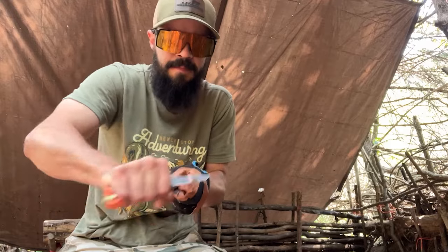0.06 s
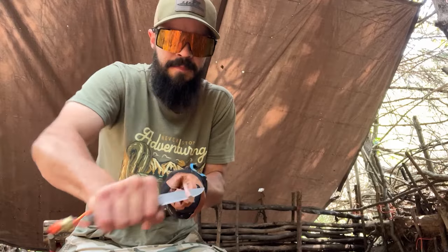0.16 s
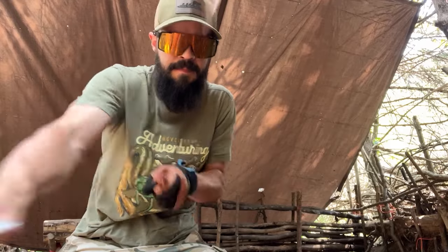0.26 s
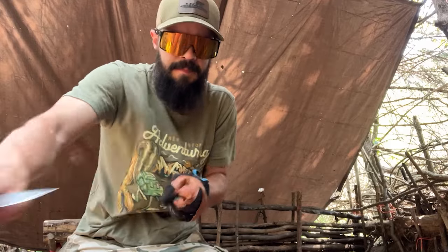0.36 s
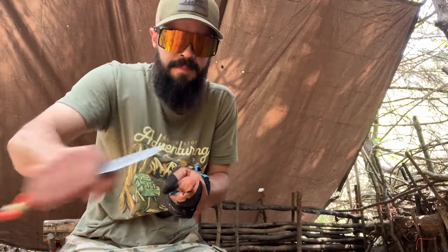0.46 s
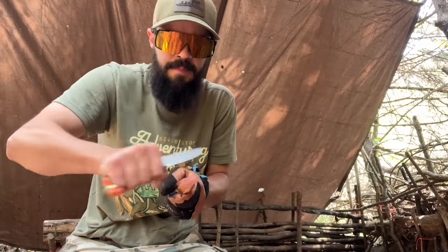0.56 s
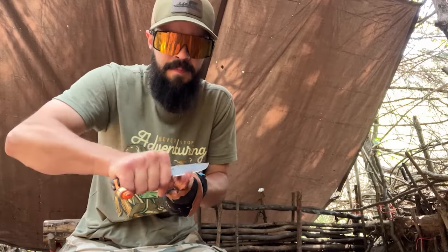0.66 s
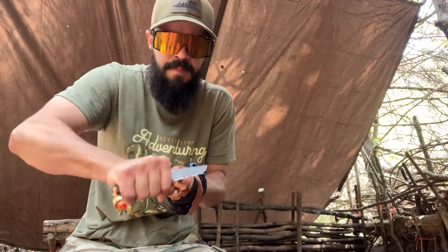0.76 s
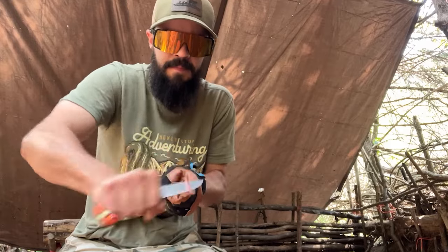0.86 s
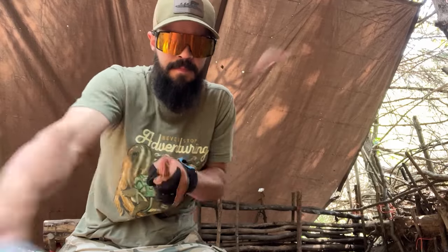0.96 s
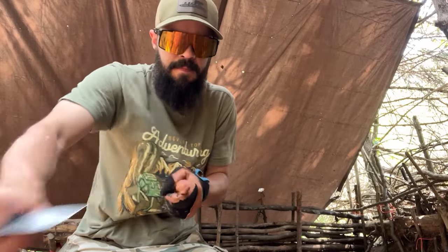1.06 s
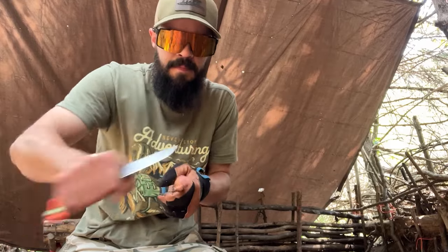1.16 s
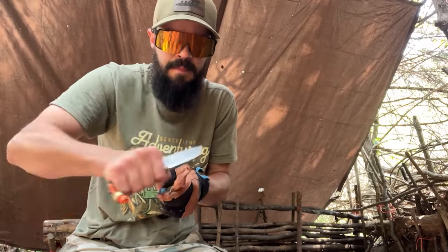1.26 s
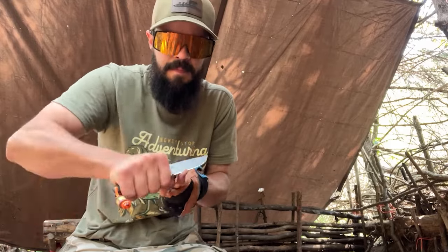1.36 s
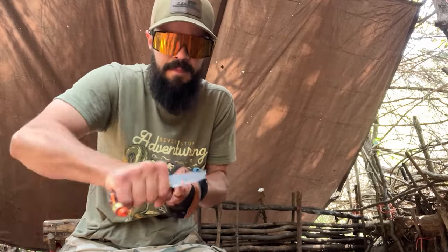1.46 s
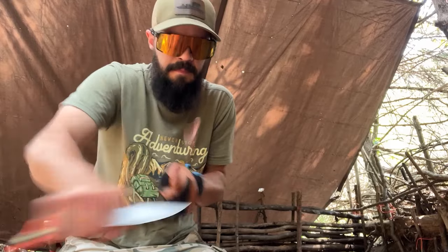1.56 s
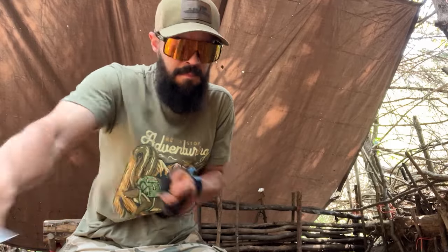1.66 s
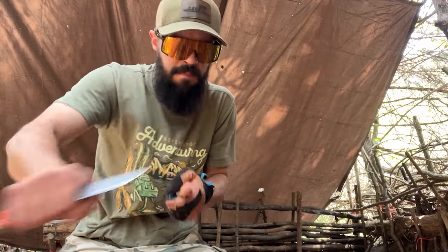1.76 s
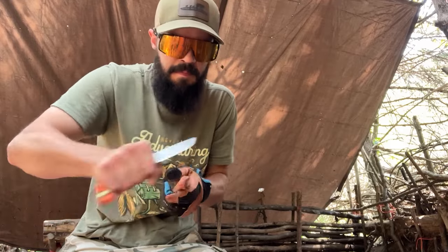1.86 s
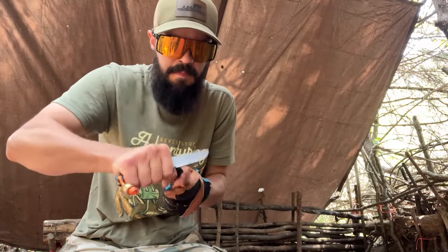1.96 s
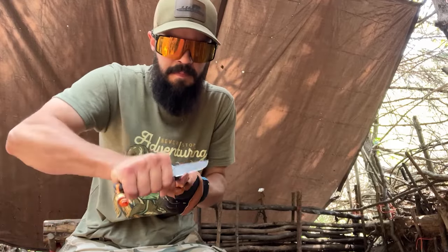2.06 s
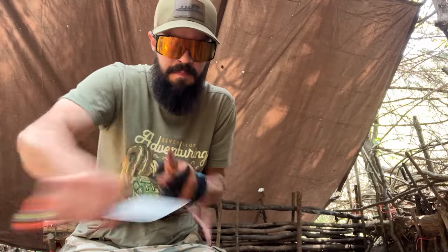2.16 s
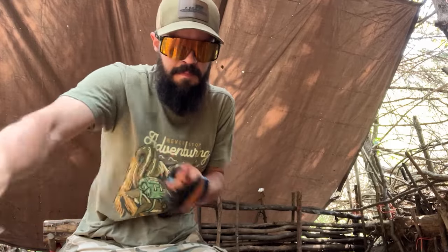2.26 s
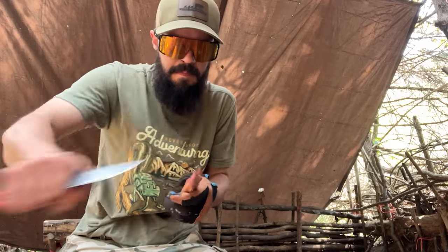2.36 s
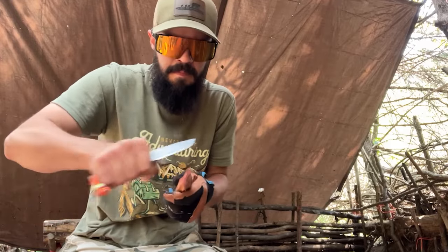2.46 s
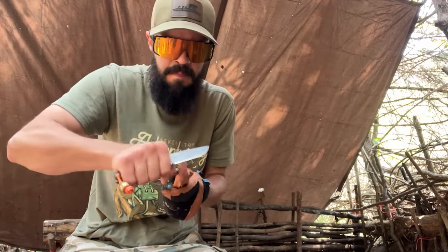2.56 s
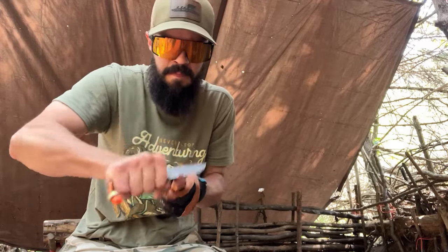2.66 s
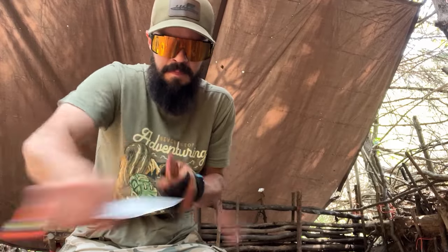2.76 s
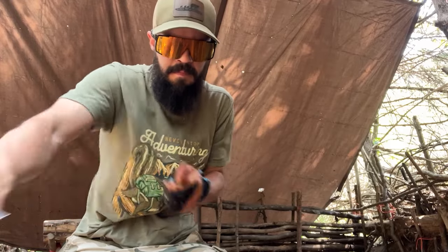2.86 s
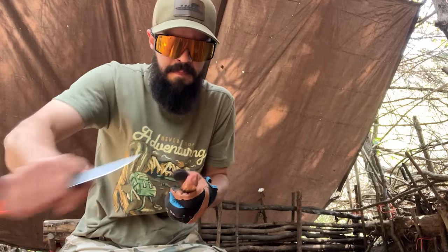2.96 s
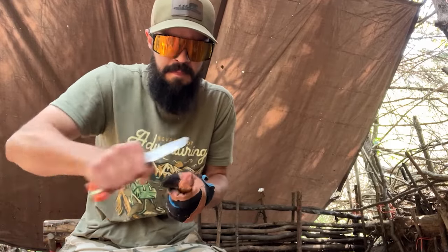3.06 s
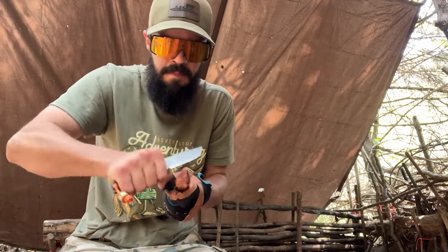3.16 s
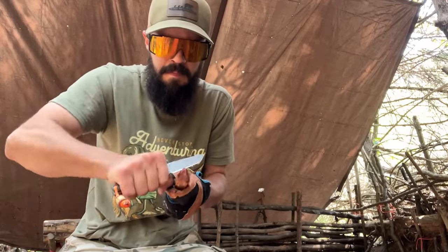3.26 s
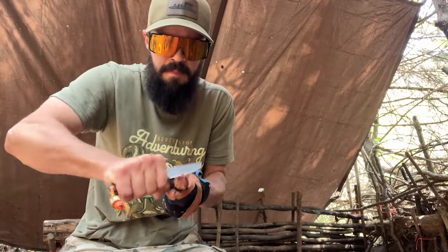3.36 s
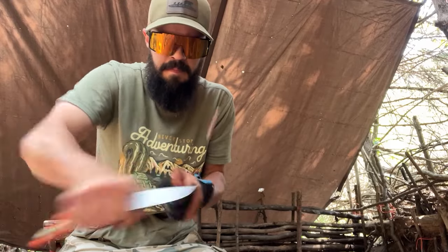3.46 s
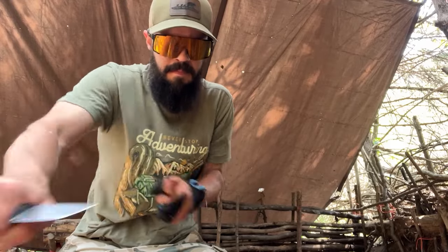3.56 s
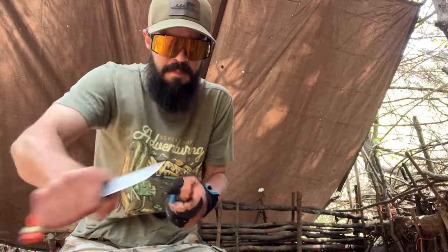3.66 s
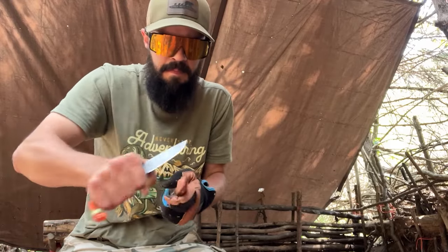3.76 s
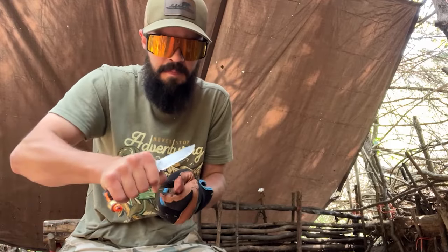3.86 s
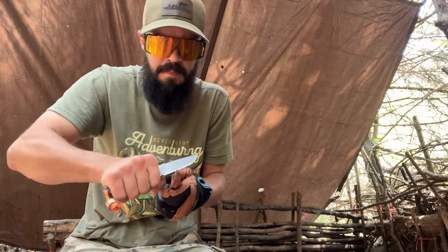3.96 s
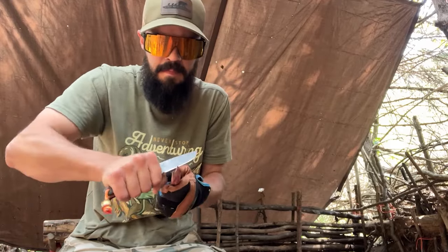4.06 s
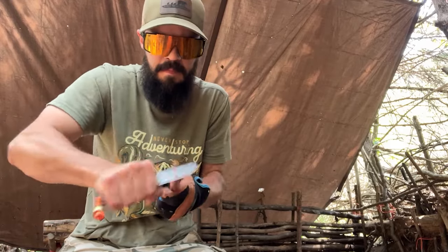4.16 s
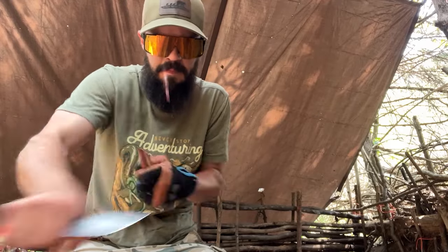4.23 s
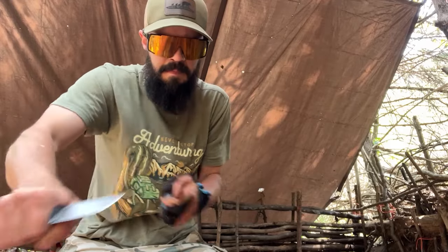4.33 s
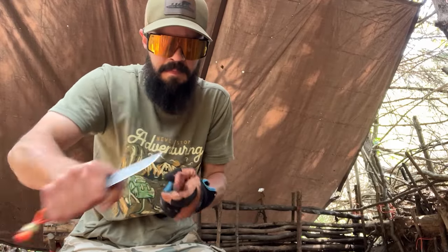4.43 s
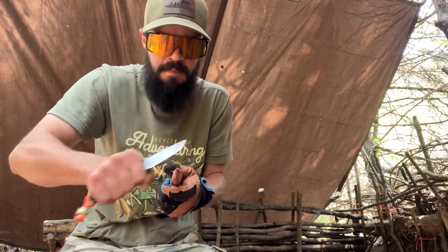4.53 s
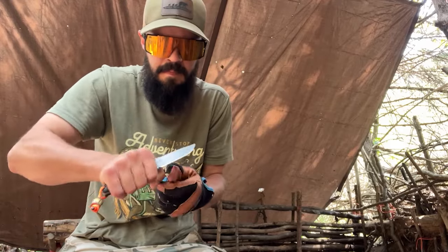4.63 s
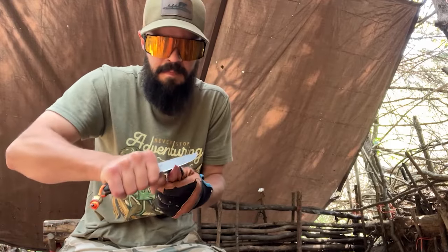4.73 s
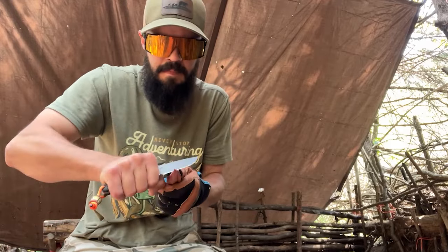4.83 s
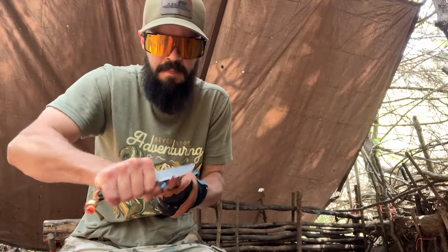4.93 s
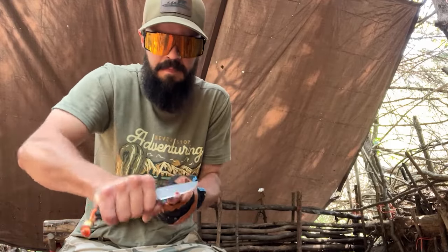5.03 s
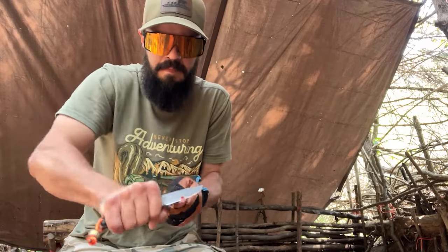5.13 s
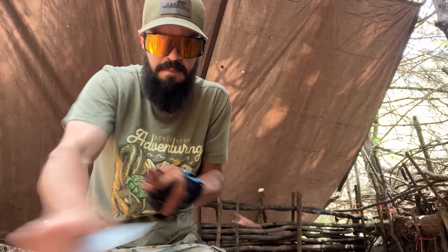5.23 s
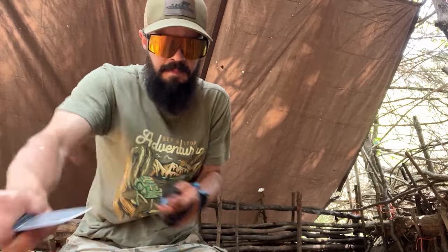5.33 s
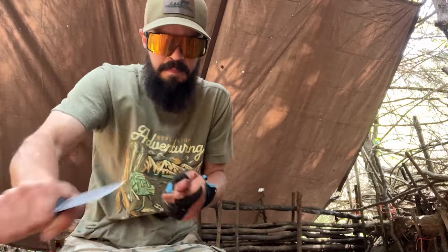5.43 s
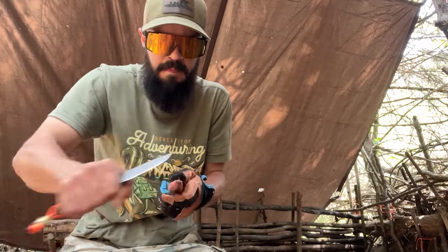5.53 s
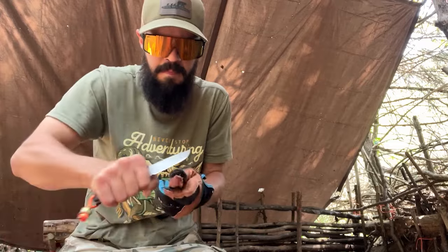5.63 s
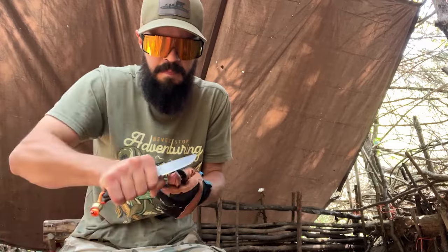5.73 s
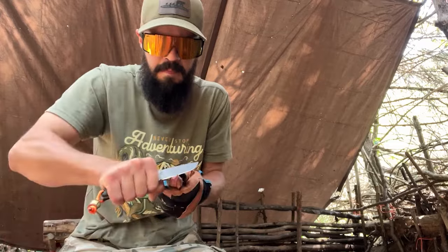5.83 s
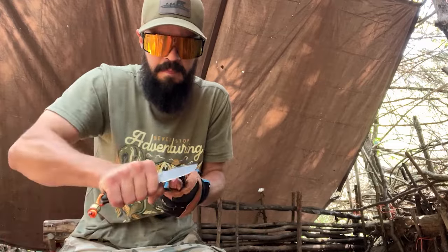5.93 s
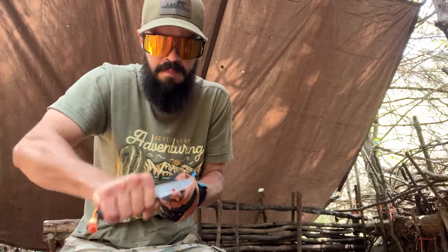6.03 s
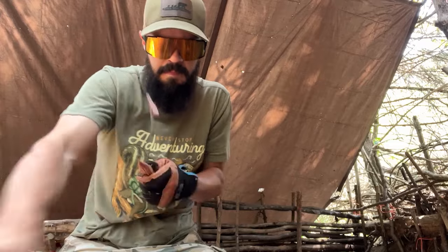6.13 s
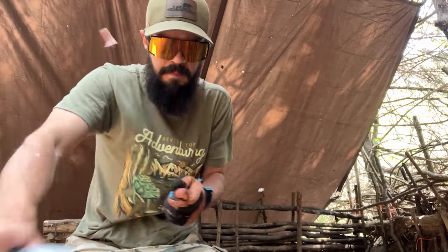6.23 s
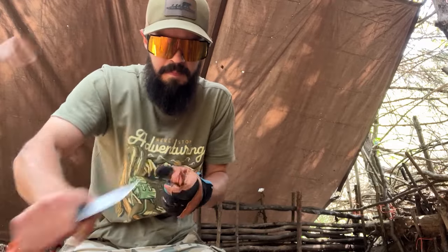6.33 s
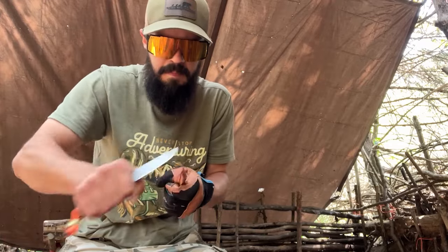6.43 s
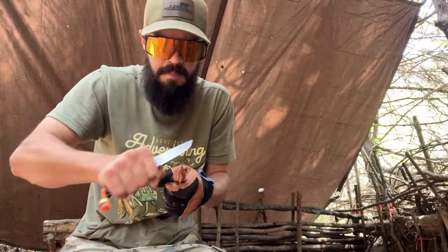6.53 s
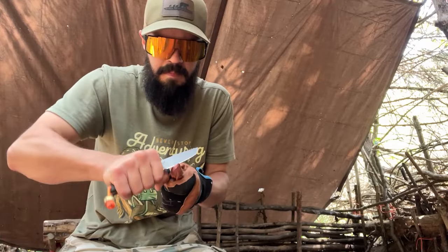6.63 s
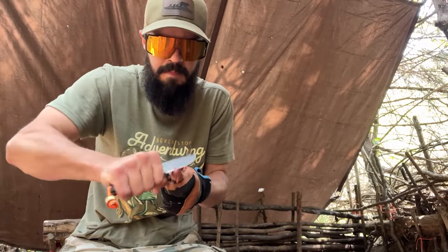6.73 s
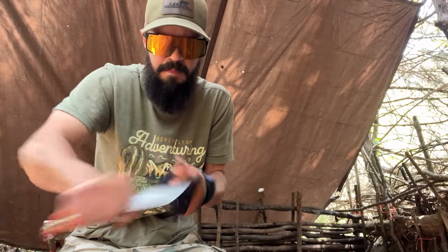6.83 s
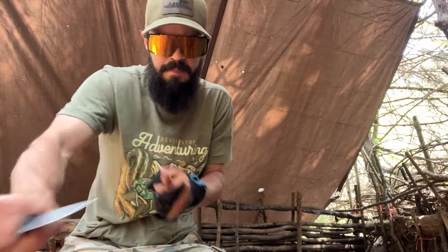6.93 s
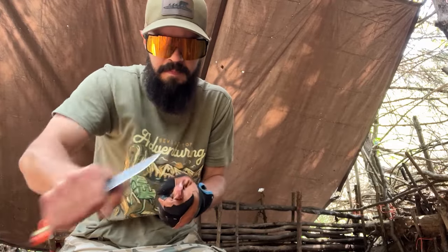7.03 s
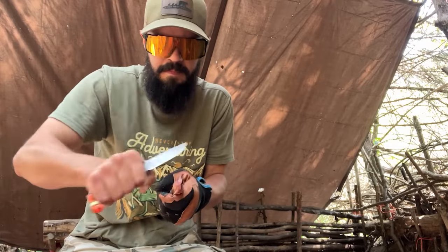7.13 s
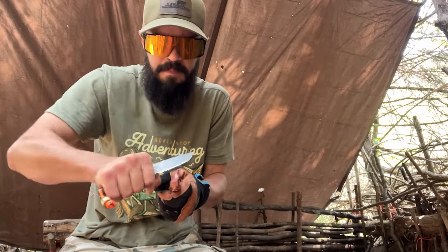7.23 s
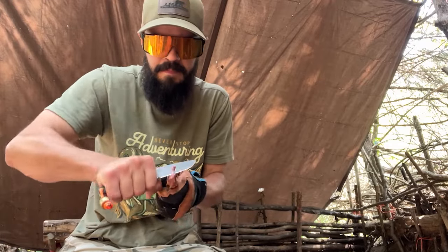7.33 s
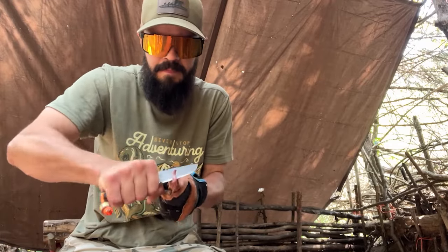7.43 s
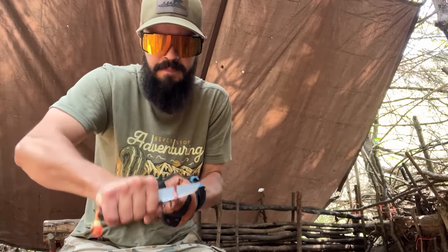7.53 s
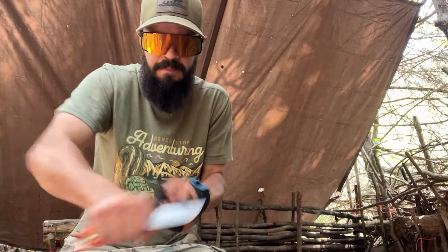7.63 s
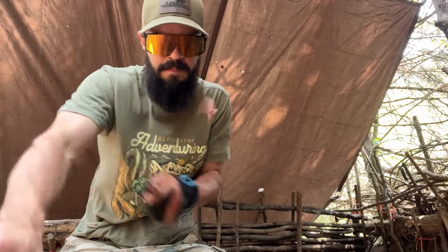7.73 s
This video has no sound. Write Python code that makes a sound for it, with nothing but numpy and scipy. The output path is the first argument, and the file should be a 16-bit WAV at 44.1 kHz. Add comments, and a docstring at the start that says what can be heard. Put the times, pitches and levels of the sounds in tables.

```python
"""Whittling a stick by hand

A knife shaves curls off a hand-held stick under a tarp in quiet woods, over a faint hiss and low air (coloured noise).
The blade is set on the wood with a dull tap (damped modes), bites in a few slips and rasps through the
fibres (random fractures through drifting resonances), then snaps the chip off (noise bursts through a band).
A sleeve swishes (swells of coloured grains) as the arm moves, and chips tick on the ground (tiny noise bursts)."""
import sys
import numpy as np
from scipy import signal
from scipy.fft import rfft, irfft, next_fast_len
from scipy.io import wavfile
from scipy.ndimage import uniform_filter1d

SR = 44100
rng = np.random.default_rng(int(sys.argv[2]) if len(sys.argv) > 2 else 0)


def to_wav(sig):
    """Store sig (one row per channel, or 1-D mono) as 16-bit WAV at the path in sys.argv[1].

    Samples outside -1..1 are clipped; the rate is SR.
    """
    pcm = np.clip(np.atleast_2d(sig), -1, 1) * 32767
    pcm = np.round(pcm).astype(np.int16)
    wavfile.write(sys.argv[1], SR, pcm.T)  # frames by channels


N = 343371
TIME = np.arange(N) / SR


def from_db(db):
    """Decibels to gain."""
    return 10 ** (np.asarray(db) / 20)


def rms_one(x):
    """Scale to unit power."""
    return x / np.sqrt(np.mean(x ** 2) + 1e-20)


def in_time(rows):
    """Each column of a curve, sample by sample."""
    s, *columns = np.transpose(rows)
    return [np.interp(TIME, s, c) for c in columns]


def at_hz(points, hz):
    """Each column of a spectrum at the given frequencies, interpolated over log frequency."""
    knots, *columns = np.transpose(points)
    return [np.interp(np.log(hz + 1), np.log(knots), c) for c in columns]


def colour(x, spectrum):
    """Causal (minimum-phase) filter that keeps the power of white noise."""
    size = 4096
    spectrum_db, = at_hz(spectrum, np.fft.rfftfreq(size, 1 / SR))
    cepstrum = irfft(np.log(rms_one(from_db(spectrum_db))))
    folded = np.r_[cepstrum[0], 2 * cepstrum[1:size // 2]]
    impulse_response = irfft(np.exp(rfft(folded, size)))
    return signal.oaconvolve(x, impulse_response)[:len(x)]


def edge(x, hz, kind, order=2):
    """Butterworth low- or high-pass."""
    sos = signal.butter(order, hz, kind, fs=SR, output="sos")
    return signal.sosfilt(sos, x + 1e-18)


def resonate(x, hz, width_hz):
    """One resonance, gain 1 on top."""
    r = np.exp(-np.pi * width_hz / SR)
    zeros = np.array([1, 0, -1]) * (1 - r * r) / 2
    poles = [1, -2 * r * np.cos(2 * np.pi * hz / SR), r * r]
    return signal.lfilter(zeros, poles, x + 1e-18)


def chip(x, hz, width_hz):
    """A chip rings in one band with steep flanks: two equal resonances in series."""
    return resonate(resonate(x, hz, width_hz), hz, width_hz)


def drift(knots_per_s):
    """Slow chance with spread 1."""
    knots = rng.standard_normal(N // 16)
    return rms_one(np.interp(TIME * knots_per_s, np.arange(len(knots)), knots))


def grains(per_s, spread_db):
    """Tiny fractures of random size and sign at random moments; rms 1."""
    sizes = from_db(spread_db * np.minimum(rng.exponential(1, N), 4))
    signs = rng.choice([-1, 1], N)
    return rms_one(sizes * signs * (rng.random(N) < per_s / SR))


def burst(t, rise_s, fall_s):
    """Envelope that climbs to 1 and dies away."""
    return np.minimum(t / rise_s, 1) * np.exp(-np.maximum(t - rise_s, 0) / fall_s)


def even(x, window_s=0.004):
    """Hold the short-term power at 1 and keep the fine grain."""
    power = uniform_filter1d(x ** 2, max(round(window_s * SR), 8))
    return x / np.sqrt(np.maximum(power, 1e-12))


def lasting(x, duration_s):
    """Give a short sound the energy of a level of 1 held that long."""
    return x * np.sqrt(duration_s * SR / np.sum(x ** 2))


def add(track, s, sound):
    """Mix a sound into a track at a moment."""
    start = max(round(s * SR), 0)
    track[start:start + len(sound)] += sound[:N - start]


# Colour of the outdoor air. Each row: frequency in Hz, relative density in dB.
AIR_COLOUR = [(25, -14), (50, 2.5), (100, -0.5), (200, -9), (400, -14.5), (800, -17.5), (1500, -23.5),
              (3000, -22.5), (5000, -15.5), (7000, -13), (10000, -10.5), (13000, -9), (15500, -2.5)]
# Course of the hiss. Each row: time in seconds, level in dB before hiss_db.
HISS_LEVELS = [(0.0, -70.5), (1.01, -67), (1.31, -73), (2.17, -61.5), (2.51, -70), (2.9, -66),
               (3.24, -70.5), (3.69, -66), (5.92, -70.5), (6.22, -69), (7.31, -75), (7.7, -73)]


def background(rumble_db=-72, hiss_db=11.0, waver_db=1.0, hiss_waver_db=1.56, split_hz=900):
    """Low outdoor air and a fine hiss: two noises of one colour, each wavering by itself."""
    hiss_course_db, = in_time(HISS_LEVELS)
    low, high = (colour(noise, AIR_COLOUR) for noise in rng.standard_normal((2, N)))
    rumble = rms_one(edge(low, split_hz, "low")) * from_db(rumble_db + waver_db * drift(9.7))
    hiss_level_db = hiss_course_db + hiss_db + hiss_waver_db * drift(14)
    hiss = rms_one(edge(high, split_hz, "high")) * from_db(hiss_level_db)
    return rumble + hiss


# Sleeve moving with the arm. Each row: middle in seconds, length in seconds, level in dB before cloth_db.
SLEEVE_SWISHES = [(.305, 0.039, -51), (.468, 0.069, -59), (.673, 0.49, -60.5), (1.06, 0.27, -66.5),
                  (1.244, 0.027, -54.5), (1.95, 0.41, -64), (2.385, 0.045, -54.5), (2.869, 0.063, -52),
                  (3.057, 0.16, -60.5), (3.29, 0.29, -68.5), (3.74, 0.16, -61.5), (4.68, 0.098, -59),
                  (5.307, 0.043, -54), (5.468, 0.065, -56.5), (5.724, 0.11, -59.5), (6.246, 0.044, -60.5),
                  (6.39, 0.097, -71), (7.735, 0.04, -50)]
# Colour of rubbing cloth. Each row: frequency in Hz, relative density in dB.
CLOTH_COLOUR = [(100, -7.5), (250, -13.5), (550, 2), (800, -5), (930, -11), (1150, 6), (1600, -0.5),
                (3800, 2.5), (6000, -1), (9000, -3.5), (16000, -4.5)]
# the sleeve tightens as the arm leans into every stroke, then swings through; levels before cloth_db
PUSH_LEAD_S, PUSH_LENGTH_S, PUSH_DB = 0.028, 0.13, -72
FOLLOW_S, FOLLOW_LENGTH_S, FOLLOW_DB = 0.1, 0.09, -72


def sleeve(cloth_db=-1.0, flutter_db=2.0):
    """Cloth slides over cloth in soft swells: faintly before and after every stroke, louder as the arm moves about."""
    pushes = [(start - PUSH_LEAD_S, PUSH_LENGTH_S, PUSH_DB) for start, *_ in STROKE_ROWS]
    swings = [(start + length + FOLLOW_S, FOLLOW_LENGTH_S, FOLLOW_DB) for start, length, *_ in STROKE_ROWS]
    power = np.zeros(N)
    for s, length, db in [*SLEEVE_SWISHES, *pushes, *swings]:
        power += from_db(2 * db) * np.exp(-np.minimum((2 * (TIME - s) / length) ** 2, 20))
    rubbing = grains(per_s=22000, spread_db=3.0) * from_db(cloth_db + flutter_db * drift(90))
    return colour(rubbing * np.sqrt(power), CLOTH_COLOUR)


# Blade shearing off a curl. Each row: start in seconds, length in seconds, final level in dB,
# climb to it in dB, edge hiss re level in dB, judder of the hands in dB.
STROKE_ROWS = [(0.025, 0.072, -51, 10.5, 4.5, -51), (0.179, 0.037, -40.5, 29, 8, -49.5),
               (0.758, .17, -45, 23.5, 6.5, -52.5), (1.433, .157, -43, 27.5, 6, -53.5),
               (2.118, 0.051, -40.5, 18, 9.5, -54), (2.678, 0.087, -46.5, 29, 6, -59.5),
               (3.362, 0.12, -49.5, 20.5, 3.5, -58.5), (4.179, 0.02, -38, 7, 1, -50),
               (4.92, 0.071, -52.5, 7, 1, -61), (5.208, 0.0056, -42.5, -2, 5, -48),
               (5.971, 0.11, -36.5, 35.5, -4, -51.5), (6.736, 0.099, -43.5, 11, -1, -51),
               (7.435, 0.067, -38, -1.5, -8.5, -55.5), (7.63, 0.0078, -44.5, 0.5, 3, -49.5)]
BITE_S, RELEASE_DB_PER_S = 0.005, 900   # the edge enters the wood; the rasp dies once it is out
CLIMB_BEND = 0.85   # under 1: the push surges just before the break
TAIL_DB, TAIL_DB_PER_S = -19, 258.5   # the loose curl brushes off the blade
# share of the climb that the hands take; they settle more slowly
JUDDER_FOLLOWS, JUDDER_RELEASE_DB_PER_S = 0.19, 399.5
# early in a stroke the edge catches again and again: period, depth, unevenness in periods
CATCH_S, CATCH_DB, CATCH_JITTER = 0.018, 11.5, 0.12


def strokes():
    """Levels of wood, edge and hands: a stroke bites, catches less and less as the push grows, and runs out."""
    wood, bright, judder = np.zeros((3, N))
    t = TIME[:SR // 2]
    for start, length, db, climb_db, edge_db, judder_db in STROKE_ROWS:
        to_go = np.maximum(1 - t / length, 0) ** CLIMB_BEND
        after_s = np.maximum(t - length, 0)
        catches = t / CATCH_S + CATCH_JITTER * drift(40)[:len(t)]
        catching_db = CATCH_DB * to_go * (0.5 - catches % 1)
        bite = np.minimum(t / BITE_S, 1)
        release_db = np.maximum(-RELEASE_DB_PER_S * after_s, TAIL_DB - TAIL_DB_PER_S * after_s)
        rasp = bite * from_db(db - climb_db * to_go + catching_db + release_db)
        hands_db = judder_db - JUDDER_FOLLOWS * climb_db * to_go
        hands_db = hands_db + catching_db - JUDDER_RELEASE_DB_PER_S * after_s
        add(wood, start, rasp)
        add(bright, start, rasp * from_db(edge_db))
        add(judder, start, bite * from_db(hands_db))
    return np.array([wood, bright, judder])


# Colour of the breaking fibres. Each row: frequency in Hz, relative density in dB.
FIBRE_COLOUR = [(400, -9.5), (640, -17.5), (1000, -8), (1250, -11), (1700, -4), (2150, -2), (2600, -13.5),
                (3000, -5.5), (3600, -6.5), (4500, -5.5), (8500, -5.5), (11500, -5.5), (13500, -9.5),
                (16000, -4.5)]


def fractures(patchy_db=3.0, sharpness=8.4, spread_db=2.5, widest_hz=450, count=44):
    """Breaking fibres ring in the curl, whose resonances come and go as it grows."""
    cracks = grains(per_s=9000, spread_db=spread_db)
    pitches_hz = np.linspace(np.sqrt(600), np.sqrt(14000), count) ** 2
    rings = np.zeros(N)
    for k, hz in enumerate(pitches_hz):
        ring = resonate(cracks, hz, min(hz / sharpness, widest_hz))
        rings += (-1) ** k * ring * from_db(patchy_db * drift(60))
    return colour(rings, FIBRE_COLOUR)


# Colour of the hands' judder. Each row: frequency in Hz, relative density in dB.
JUDDER_COLOUR = [(40, -14.5), (90, -1.5), (130, -1), (200, -6.5), (320, -3.5), (450, -3.5), (700, -27),
                 (2000, -49.5)]


def shaving(curl_db=-5.5, curl_width_hz=900, ragged_db=0.75, split_hz=3700):
    """Fibres part in a dense crackle under the edge, and the hands judder with the cut."""
    wood, bright, judder = np.hypot(strokes() * sticking() * tearing(), slips())
    crackle = fractures()
    body = rms_one(edge(crackle, split_hz, "low", order=4))
    splitting = grains(per_s=5500, spread_db=1.5)
    # around its break the long chip colours the crackle with its own pitch
    for s, _, hz, *_ in SNAP_ROWS:
        share = from_db(curl_db) * np.exp(-np.minimum(((TIME - s) / 0.023) ** 2, 20))
        body += share * rms_one(chip(splitting, hz, curl_width_hz))
    body = even(body) * wood
    rasp = even(edge(crackle, split_hz, "high", order=4)) * bright
    hands = even(colour(grains(per_s=1000, spread_db=3.0), JUDDER_COLOUR), window_s=0.025)
    bundles = from_db(ragged_db * drift(450))   # fibres give way in bundles
    return (body + rasp) * bundles + hands * judder


# Stick and blade, damped by the hands. Each row: mode in Hz, width in Hz, level in dB; varied per touch.
STICK_MODES = [(457, 89, -2), (781, 100, 0), (1010, 53, -2), (1353, 24, -2), (1693, 210, -8),
               (2540, 38, -2.5), (3170, 63, -9), (3900, 99, -18), (4680, 210, -18.5)]


def stick(x, vary_db=4.5, shift=0.039):
    """Parallel modes; strengths depend on where the stick is touched, pitches a little on the grip."""
    touch_db = rng.normal(0, vary_db, len(STICK_MODES))
    grip = np.exp(shift * rng.standard_normal(len(STICK_MODES)))
    out = np.zeros(len(x))
    for k, (hz, width_hz, db) in enumerate(STICK_MODES):
        out += (-1) ** k * from_db(db + touch_db[k]) * resonate(x, hz * grip[k], width_hz)
    return out


# Blade set on the stick. Each row: time in seconds (sounds 1.9 ms later), level in dB before the part gains,
# hardness re level in dB, pitch of the main mode in Hz.
TAP_ROWS = [(0.184, -45, -6, 1060), (0.693, -36.5, -0.5, 1070), (1.347, -37.5, -27, 914),
            (2.039, -33.5, -1.5, 764), (2.643, -36.5, -18.5, 770), (3.235, -36, -36.5, 765),
            (4.002, -41.5, -18.5, 920), (4.766, -50, 6.5, 786), (5.788, -43.5, -19.5, 837),
            (6.621, -34, -12.5, 770), (7.313, -36, 4, 791)]


def taps(wood_db=-5.5, main_db=-9.5, main_width_hz=170, settle_db=-31.5, settle_s=0.0037, grip_s=0.011):
    """The blade lands on the stick, which knocks in the damping grip, and grates briefly as it settles."""
    out, t = np.zeros(N), TIME[:SR // 12]
    damping = np.exp(-t / grip_s)
    for (s, db, hard_db, hz), noise in zip(TAP_ROWS, rng.standard_normal((len(TAP_ROWS), len(t)))):
        grating = noise * np.exp(-t / settle_s)
        contact = (t == 0) + from_db(settle_db) * grating
        knock = from_db(wood_db) * lasting(stick(contact, vary_db=4.0) * damping, 0.0023)
        main = from_db(main_db) * lasting(chip(contact, hz, main_width_hz) * damping, 0.0046)
        scrape = edge(stick(grating) * damping, 1400, "high", order=4)
        bite = from_db(hard_db) * lasting(scrape, 0.0007)
        add(out, s + 0.0019, from_db(db) * (knock + main + bite))
    return out


# Hard slips, where the edge jumps on. Each row: time in seconds, level in dB before the part gains.
SLIP_ROWS = [(.192, -40), (0.206, -30.5), (.804, -37.5), (0.842, -31), (1.479, -36.5), (1.506, -38),
             (2.677, -48), (3.36, -45.5), (3.394, -38), (4.149, -37), (4.17, -33), (4.185, -25.5),
             (4.934, -44.5), (4.957, -37), (4.976, -38), (5.973, -46.5), (5.984, -45), (5.997, -35.5),
             (6.025, -30), (6.055, -31), (6.752, -40), (6.789, -32.5), (6.808, -31), (6.84, -34.5),
             (7.407, -41.5), (7.417, -38), (7.444, -24.5), (7.473, -20.5), (7.497, -25.5), (7.544, -40),
             (7.567, -44.5)]


def slips(wood_db=-6.5, edge_db=-10.0, jolt_db=-17.0, jolt_top_db=-48.0, fall_s=0.0036, jolt_s=0.01):
    """Levels of wood, edge and hands: a slip frees a flurry as bright as its stroke; the hands give only so far."""
    wood, bright, jolts = np.zeros((3, N))
    t = TIME[:SR // 15]
    for s, db in SLIP_ROWS:
        # the stroke that starts nearest
        *_, hiss_db, _ = min(STROKE_ROWS, key=lambda stroke: abs(stroke[0] - s))
        flurry = from_db(db) * burst(t, 0.0015, fall_s)
        add(wood, s, flurry * from_db(wood_db))
        add(bright, s, flurry * from_db(hiss_db + edge_db))
        add(jolts, s, from_db(min(db + jolt_db, jolt_top_db)) * burst(t, 0.0055, jolt_s))
    return np.array([wood, bright, jolts])


def sticking(stick_s=0.014, depth_db=8.5):
    """Gain of the stroke: it fades while the edge is stuck and returns with the slip."""
    stuck, ramp = np.zeros(N), np.linspace(0, 1, max(round(stick_s * SR), 2))
    for s, _ in SLIP_ROWS:
        add(stuck, s - stick_s, np.sqrt(ramp))
    return from_db(-depth_db * np.minimum(stuck, 1))


# Chip breaking loose. Each row: time in seconds, level in dB before the part gains, chip pitch in Hz,
# crack re level in dB, stick's knock re level in dB before knock_db.
SNAP_ROWS = [(0.204, -14.5, 5110, -9, -21), (0.217, -9, 1550, -20.5, -18), (0.93, -7, 2844, -12, -18),
             (1.582, -3, 2720, -8, -35.5), (2.173, -19.5, 1705, -4.5, -28.5),
             (2.762, -21.5, 1440, -10, -13), (3.472, -13.5, 2070, -19.5, -27.5),
             (4.204, -22, 2540, -24, -12), (5.227, -28, 2040, -32, -17.5), (6.075, -13, 2344, -14.5, -25),
             (7.445, -19, 2102, -19, -20.5), (7.475, -18, 2920, -11.5, -38), (7.647, -22.5, 2033, -22, -15)]
# Colour of the crack. Each row: frequency in Hz, relative density in dB.
CRACK_COLOUR = [(200, -23.5), (700, -17.5), (1200, -15.5), (3000, -2.5), (5000, -4.5), (9000, 0.5),
                (11500, -6), (13500, -11.5), (16000, -9)]


def snaps(chip_db=-6.0, knock_db=-0.5, tail_db=-14.5, chip_width_hz=900,
          rise_s=0.002, fall_s=0.00062, tail_s=0.0032):
    """The last fibres tear in about two milliseconds; the freed chip rings at its own pitch, the stick recoils."""
    wood, cracks, t = np.zeros(N), np.zeros(N), TIME[:SR // 20]
    tear = burst(t, rise_s, fall_s) + from_db(tail_db) * burst(t, rise_s, tail_s)
    noises = rng.standard_normal((len(SNAP_ROWS), 3, len(t)))
    for (s, db, hz, crack_db, stick_db), noise in zip(SNAP_ROWS, noises):
        ringing = from_db(chip_db) * lasting(chip(noise[0] * tear, hz, chip_width_hz), 0.00042)
        recoil = from_db(stick_db + knock_db) * lasting(chip(noise[1] * tear, 1100, 800), 0.002)
        add(wood, s, from_db(db) * (ringing + recoil))
        add(cracks, s, from_db(db + crack_db) * noise[2] * tear)
    return wood + colour(cracks, CRACK_COLOUR)


def tearing(surge_s=0.0056, surge_db=4):
    """Gain of the stroke: it swells and falls back around each snap as the last fibres start to tear."""
    surge, ramp = np.zeros(N), np.linspace(0, 1, max(round(surge_s * SR), 2))
    for s, *_ in SNAP_ROWS:
        add(surge, s - surge_s, np.r_[ramp, ramp[::-1]])
    return from_db(surge_db * np.minimum(surge, 1))


# Chips landing and splinters parting. Each row: time in seconds, level in dB before tick_db, pitch in Hz.
TICK_ROWS = [(2.3131, -34, 9700), (2.591, -49, 8630), (2.9436, -40.5, 8760), (4.2714, -41, 8680),
             (4.555, -33, 6160), (4.7253, -45.5, 9250), (5.3926, -41.5, 9100), (6.6646, -48.5, 8460)]


def ticks(tick_db=3.0, fall_s=0.00086, tail_db=-6.5, tail_s=0.0023, width_hz=9000, wood_db=-3.5):
    """Light dry chips make tiny bright clicks with a little wood in them."""
    out, t = np.zeros(N), TIME[:SR // 40]
    shape = burst(t, 0.00014, fall_s) + from_db(tail_db) * burst(t, 0.0012, tail_s)
    for (s, db, hz), noise in zip(TICK_ROWS, rng.standard_normal((len(TICK_ROWS), len(t)))):
        click = from_db(db + tick_db) * shape * noise
        add(out, s, resonate(click, hz, width_hz) + from_db(wood_db) * stick(click))
    return out


# Chest, knees and ground. Each row: delay left in seconds, delay right in seconds, level in dB before the low-pass.
NEAR_REFLECTIONS = [(.0011, 0.0012, -21.5), (.0033, 0.0033, -21.5), (.0062, 0.0086, -10.5)]


def shelter(x, wet_db=-16.0, t60_s=0.11, wall_hz=5000, gap_s=0.0042):
    """A few near reflections, then a short dull echo from the tarp, different on each side."""
    t = TIME[:SR // 4]
    echoes = edge(rng.standard_normal((2, len(t))), wall_hz, "low", order=1)
    echoes *= from_db(-60 * t / t60_s) * (t > gap_s)
    echoes *= from_db(wet_db) / np.sqrt(np.sum(echoes ** 2, axis=1, keepdims=True))
    near = np.zeros_like(echoes)
    for left_s, right_s, db in NEAR_REFLECTIONS:
        near[[0, 1], [round(left_s * SR), round(right_s * SR)]] += from_db(db)
    response = echoes + edge(near, 7000, "low", order=1)
    return signal.oaconvolve(x[None], response, axes=1)[:, :N]


def scene(diffuse_db=1.0):
    """The carving is straight ahead; part of the background, opposite in sign left and right, is all around."""
    carving = sleeve() + shaving() + taps() + snaps() + ticks()
    around = from_db(diffuse_db) * edge(edge(background(), 6610, "low"), 250, "high", order=1)
    return carving + shelter(carving) + background() + around * np.array([[1], [-1]])


# Two microphone ports. Each row: frequency in Hz, lead of the left in radians, left minus right in dB.
PORT_DIFFERENCES = [(300, -0.3, -0.8), (1000, -0.1, 1.9), (2000, -0.2, -1.0), (3000, -0.3, -3.2),
                    (4000, -0.2, -1.9), (5200, -1.1, -3.9), (7200, -1.4, -2.2), (9000, -0.3, 0.2),
                    (11000, 0.6, -0.1), (12500, 2.0, -0.1), (14000, 3.1, -0.1), (15800, 3.5, -0.4)]
CUTOFF_HZ = 16200


def record(dry):
    """Each port turns phase and level in its own way; peaks are rounded, deep bass and top are cut."""
    size = next_fast_len(N + SR // 10)
    lead_rad, balance_db = at_hz(PORT_DIFFERENCES, np.fft.rfftfreq(size, 1 / SR))
    sides = np.array([[1], [-1]]) / 2
    turn = from_db(sides * balance_db) * np.exp(1j * sides * lead_rad)
    heard = irfft(rfft(dry, size) * turn, size)[:, :N]
    rounded = np.tanh(edge(heard, 27, "high"))
    return signal.sosfilt(signal.ellip(10, 0.1, 80, CUTOFF_HZ, fs=SR, output="sos"), rounded)


dry = scene()
out = record(dry)
to_wav(out)
```